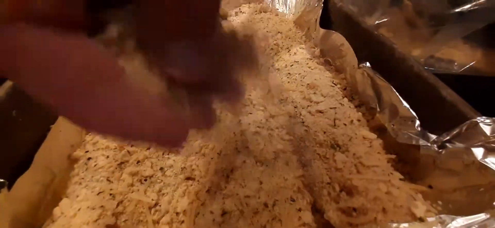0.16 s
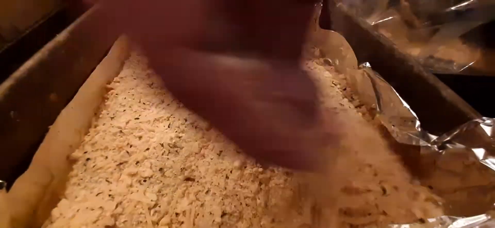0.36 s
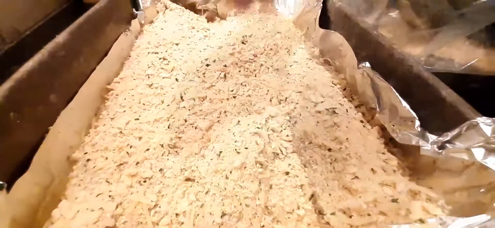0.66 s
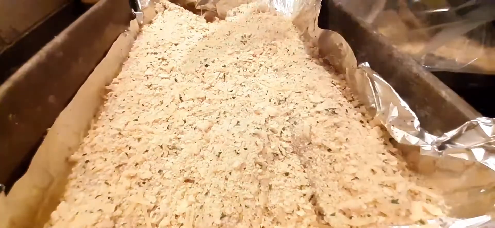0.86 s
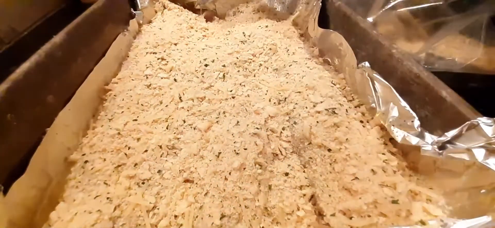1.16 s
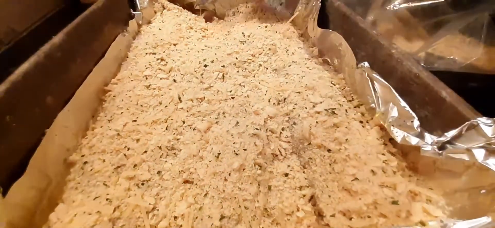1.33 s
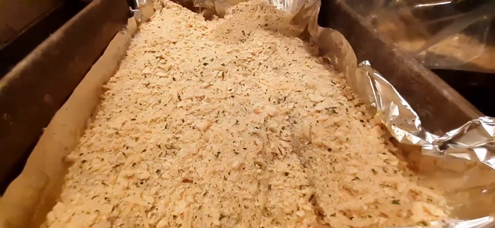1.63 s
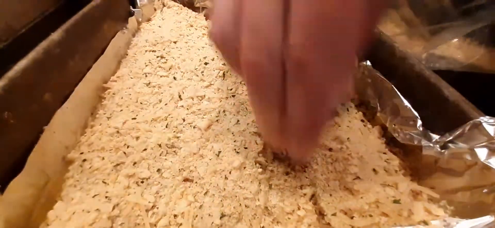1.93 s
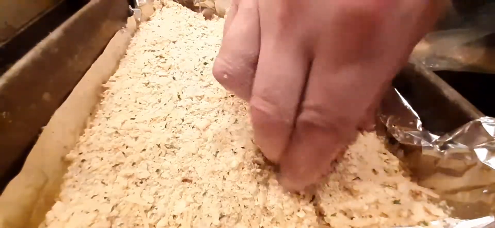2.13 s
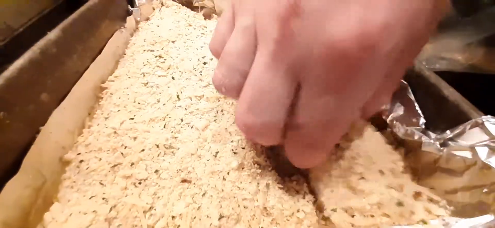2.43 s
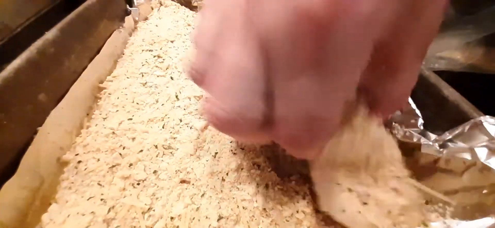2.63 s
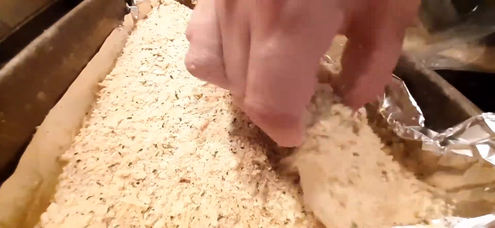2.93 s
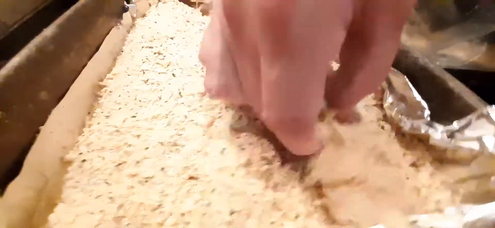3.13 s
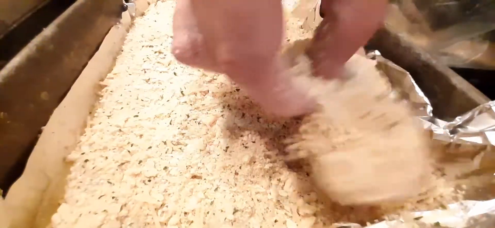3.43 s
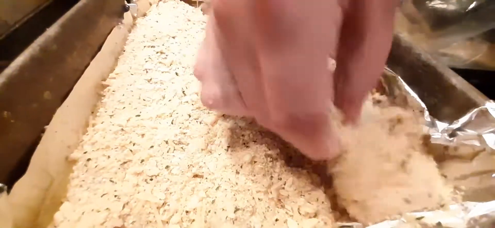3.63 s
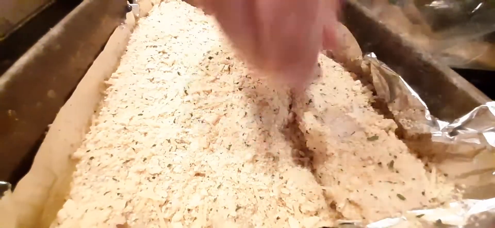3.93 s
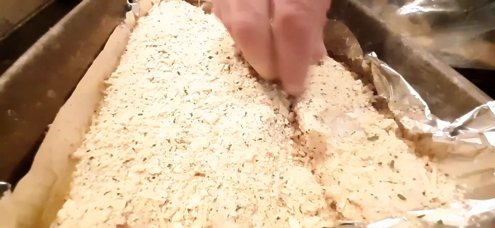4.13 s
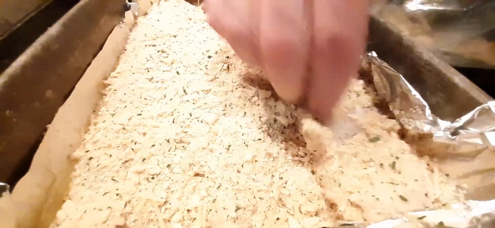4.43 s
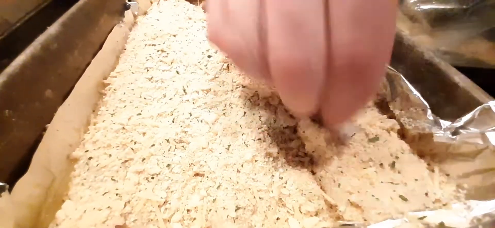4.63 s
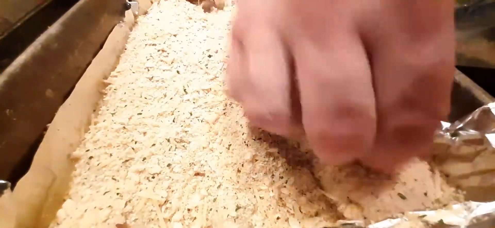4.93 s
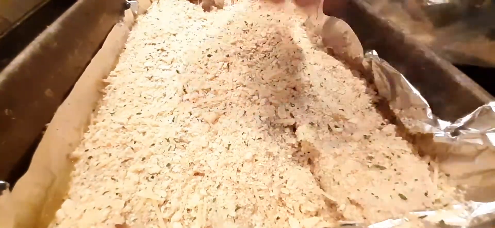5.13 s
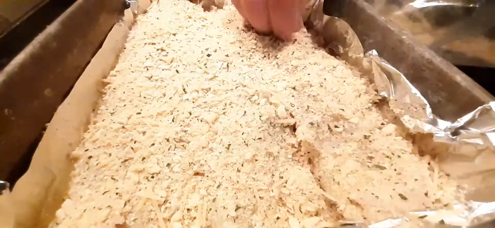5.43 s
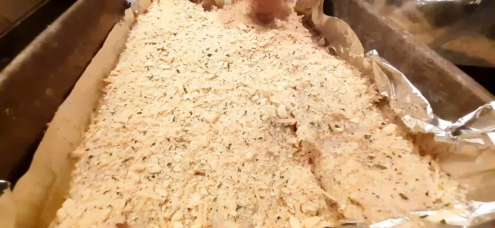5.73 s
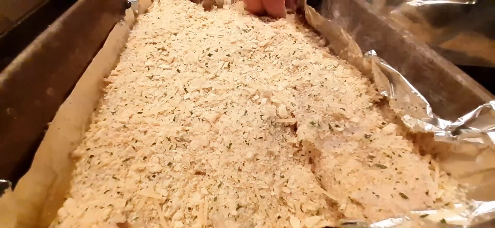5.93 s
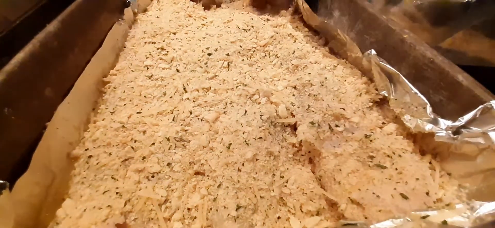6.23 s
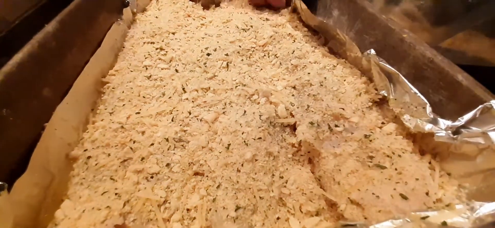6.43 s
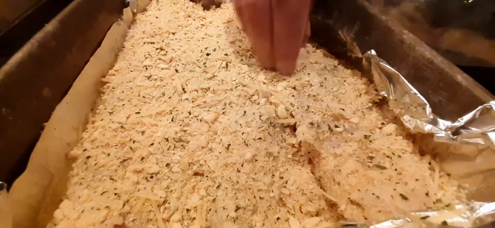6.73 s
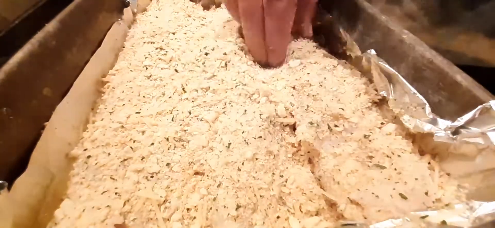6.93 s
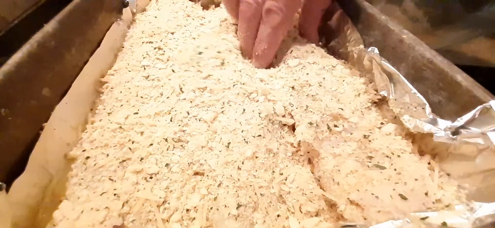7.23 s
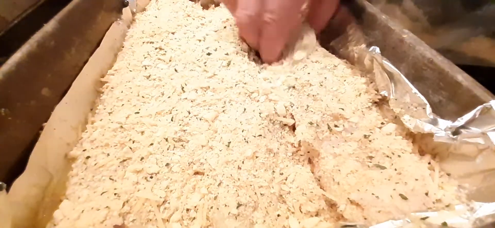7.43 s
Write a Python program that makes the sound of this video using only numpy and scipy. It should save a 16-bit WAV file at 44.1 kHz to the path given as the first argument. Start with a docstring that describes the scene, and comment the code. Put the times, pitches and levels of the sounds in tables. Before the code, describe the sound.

A pinch of dry cracker crumbs lands with a brittle crackle on fish in a foil-lined metal pan. Fingers pat and push the coating, making the foil snap and the pan tick. A fillet is dragged aside with gritty rustling, then light touches lead to three firm pats and a last few shoves. It all sounds close, over a low kitchen appliance hum.

```python
"""Fingers coat fish with dry cracker crumbs in a foil-lined metal pan, over a humming kitchen appliance.
First a pinch of crumbs lands: brittle grains fracture and foil creases snap. From 0.4 s pats and shoves
bump the soft fish, rustle the foil and knock the pan; near 1 s a thin, high whine glides in and out.
More crumbs fall, and from 2 to 4 s the hand drags a fillet aside, buckling the foil. Light touches follow,
then three firm pats around 6 s as the whine returns, and a few last pats, shoves and sprinkles."""
import sys
import numpy as np
from scipy import signal
from scipy.fft import rfft, irfft, next_fast_len
from scipy.io import wavfile
from scipy.ndimage import map_coordinates

SR = 44100
rng = np.random.default_rng(int(sys.argv[2]) if len(sys.argv) > 2 else 0)


def materialize(psi):
    """Save the field psi as 16-bit PCM at rate SR to the path in sys.argv[1].

    A 1-D psi becomes a single channel; in a 2-D psi each row is a channel.
    """
    bounded = np.clip(np.atleast_2d(psi).T, -1, 1)
    quanta = np.round(bounded * 32767).astype(np.int16)
    wavfile.write(sys.argv[1], SR, quanta)


N = 333396
TIME = np.arange(N) / SR


def from_db(db):
    """Amplitude ratio of a level in decibels."""
    return 10 ** (np.asarray(db) / 20)


def unit_rms(x):
    """Normalisation to a mean power of one."""
    return x / np.sqrt(np.mean(x ** 2) + 1e-20)


def at_hz(points, hz):
    """Interpolation of a spectrum on a log-frequency axis."""
    freqs, values = np.transpose(points)
    return np.interp(np.log(hz + 1), np.log(freqs), values)


def panned(db):
    """Level difference, left minus right, as two gains of mean power one."""
    return unit_rms(from_db(np.array([[db], [-db]]) / 2))


def drift(per_s):
    """Random modulation of unit rms, interpolated between per_s values a second."""
    knots = rng.standard_normal(4096)
    return unit_rms(map_coordinates(knots, [TIME * per_s], order=1, mode="wrap"))


def add(out, s, sound):
    """Superposition of a short sound or envelope at time s."""
    start = max(int(s * SR), 0)
    out[:, start:start + sound.shape[1]] += sound[:, :max(N - start, 0)]


def through(x, response):
    """Convolution, kept to the length of the scene."""
    return signal.oaconvolve(x, response, axes=-1)[:, :N]


def minimum_phase(spectrum, size=1024):
    """Causal impulse response of unit energy, from the folded cepstrum of a spectrum."""
    magnitude = from_db(at_hz(spectrum, np.fft.rfftfreq(size, 1 / SR)))
    cepstrum = irfft(np.log(magnitude))
    cepstrum[1:size // 2] *= 2
    cepstrum[size // 2 + 1:] = 0
    response = irfft(np.exp(rfft(cepstrum)))
    return response / np.linalg.norm(response)


def resonance(x, hz, width):
    """Damped two-pole resonator with unit peak gain."""
    radius = np.exp(-np.pi * width / SR)
    feedback = [1, -2 * radius * np.cos(2 * np.pi * hz / SR), radius ** 2]
    return signal.lfilter(np.array([1, 0, -1]) * (1 - radius ** 2) / 2, feedback, x)


def ringing(x, modes):
    """Modal superposition: a sound plus the resonances it excites, at unit energy."""
    x = x + sum(from_db(db) * resonance(x, hz, width) for hz, width, db in modes)
    return x / np.linalg.norm(x)


# Mains and motor tones: (frequency [Hz], relative level [dB], random modulation depth [ratio])
HUM_TONES = [(60.3, -52.5, 1), (120.25, -43, 0.07), (150, -55, 0), (199.8, -55, 0.84), (241.4, -52, 0.36),
             (256.4, -54.5, 0.2), (433.4, -60.5, 1.8), (443, -59, 1.3)]
# Slow swell of the appliance: (time [s], level before scaling [dB])
APPLIANCE_SWELL = [(0.0, -50), (0.04, -44.5), (2.97, -45), (3.56, -42.5), (4.06, -46.5), (6.13, -44.5),
                   (6.78, -49), (6.89, -44), (7.09, -49.5), (7.39, -47), (7.41, -49), (7.56, -43.5)]
# Air noise: (frequency [Hz], relative spectral level [dB])
AIR_SPECTRUM = [(30, -29), (44, -21), (60, 7), (80, -5), (130, 0), (290, 0), (365, -4.5), (440, -3),
                (700, -9), (1100, -18.5), (2300, -26), (5000, -23.5), (9000, -36), (16000, -40)]
# Resonances in the air noise: (frequency [Hz], bandwidth [Hz], gain [dB])
AIR_RESONANCES = [(1575, 58, 5.5), (2940, 520, -4.5), (4930, 390, -9.5)]
# Likeness of the air noise left and right: (frequency [Hz], coherence [0-1])
AIR_COHERENCE = [(60, 1), (130, 0.54), (250, 0.53), (500, 0.32), (1000, 0), (16000, 0)]
def appliance():
    """Tonal plus broadband noise: mains and motor tones waver over a partly coherent rush of air."""
    swell_db = np.interp(TIME, *np.transpose(APPLIANCE_SWELL))
    swell_db -= swell_db.mean()
    hum = 0
    for hz, db, depth in HUM_TONES:
        phasor = 1 + depth * (drift(9) + 1j * drift(9))
        hum += from_db(db) * unit_rms(np.real(phasor * np.exp(2j * np.pi * hz * TIME)))
    size = next_fast_len(N)
    freqs = np.fft.rfftfreq(size, 1 / SR)
    mid, side = rfft(rng.standard_normal((2, size)))
    coherence = np.clip(at_hz(AIR_COHERENCE, freqs), 0, 1)
    stereo = np.sqrt(1 + coherence) * mid + np.sqrt(1 - coherence) * side * [[1], [-1]]
    rush = irfft(from_db(at_hz(AIR_SPECTRUM, freqs)) * stereo, size)[:, :N]
    air = unit_rms(ringing(rush, AIR_RESONANCES))
    hum_gain, air_gain = from_db(-3 + 1.08 * swell_db), from_db(-47.5 + 0.16 * swell_db)
    return hum_gain * hum * panned(4.0) + air_gain * air * panned(0.17)


def power_shares(db, foil_db):
    """Power is amplitude squared: one gesture's push, rustle and crackle, as a column."""
    return from_db([[db], [db + foil_db], [db]]) ** 2


def swells(rows, release):
    """Gaussian power envelopes; release is the ratio of fall time to rise time."""
    power = np.zeros((3, N))
    for s, rise_s, db, foil_db in rows:
        near = slice(max(int((s - 4 * rise_s) * SR), 0), int((s + 5 * rise_s) * SR))
        age = TIME[near] - s
        width_s = np.where(age < 0, rise_s, rise_s * release)
        power[:, near] += power_shares(db, foil_db) * np.exp(-(age / width_s) ** 2)
    return power


# Falling pinches of crumbs: (crest time [s], rise time [s], relative level [dB], foil offset [dB])
PINCHES = [(.096, 0.022, -42.5, 8), (.145, 0.023, -50, 7), (1.388, 0.011, -46.5, -19),
           (1.445, 0.027, -42, -1), (1.55, 0.48, -61, 4.5), (2.49, 0.068, -50, 11),
           (3.565, 0.064, -38.5, -4), (5.645, 0.018, -49, 0), (5.77, 0.077, -64, -10), (7.26, 0.05, -49, 4),
           (7.447, 0.0082, -36.5, -11)]
def sprinkles():
    """Many small impacts merge into one smooth power envelope as each pinch rains on the coating."""
    return swells(PINCHES, release=1.14)


# Crack of a crumb: (frequency [Hz], relative spectral level [dB])
CRUMB_SPECTRUM = [(1200, -13.5), (3000, -1.5), (4500, -1), (6500, -0.5), (9000, -1), (12500, 0.2),
                  (16000, -4)]
def crumb_fracture():
    """Brittle fracture: a sudden release of stress radiates a bright, broadband pulse."""
    return minimum_phase(CRUMB_SPECTRUM)


# Tick of the foil: (frequency [Hz], relative spectral level [dB])
FOIL_SPECTRUM = [(400, -16), (850, -6), (1200, 2.5), (2100, 4), (2500, 2.5), (3600, -1), (5500, -2.5),
                 (12000, -19.5)]
# Ringing of the foil in the pan: (frequency [Hz], bandwidth [Hz], gain [dB])
FOIL_RESONANCES = [(1410, 240, -5), (1853, 120, 1.5), (2980, 43, 1.5), (3970, 120, 0.5)]
def foil_tick():
    """Impulse response of a thin sheet: a click that rings the foil's modes."""
    return ringing(minimum_phase(FOIL_SPECTRUM), FOIL_RESONANCES)


def pan_echoes(t60, echo_db, size=512):
    """Early reflections: a direct click and its dense echoes in the pan, different left and right."""
    echoes = rng.standard_normal((2, size)) * from_db(-60 * TIME[:size] / t60)
    echoes *= from_db(echo_db) / np.linalg.norm(echoes, axis=1, keepdims=True)
    echoes[[0, 1], rng.integers(0, 26, 2)] += 1   # direct path, with its own delay on each side
    return echoes / np.linalg.norm(echoes, axis=1, keepdims=True)


def grains(response, per_s, spread_db, clump_db, spots=8):
    """Shot noise of unit rms: uneven impulses, swelling in clumps, from several spots in the pan."""
    sizes = from_db(spread_db * np.minimum(rng.exponential(1, N), 4) + clump_db * drift(220))
    clicks = sizes * rng.choice([-1, 1], N) * (rng.random(N) < per_s / SR)
    spot = rng.integers(0, spots, N)
    swarm = sum(through((clicks * (spot == k))[None], pan_echoes(t60=0.014, echo_db=-0.5))
                for k in range(spots))
    return unit_rms(through(swarm, response[None]))


# Dull push on the fish: (frequency [Hz], relative spectral level [dB])
FISH_SPECTRUM = [(50, -26), (110, -7.5), (220, -6.5), (520, -8), (850, -3.5), (1300, -15.5), (3000, -49.5)]
def strokes(push, rustle, crackle):
    """Amplitude-modulated shot noise: the hand bumps the fish, crumples the foil and grinds crumbs."""
    fish = push * grains(minimum_phase(FISH_SPECTRUM), per_s=2500, spread_db=1.5, clump_db=1.5)
    foil = rustle * grains(foil_tick(), per_s=2400, spread_db=1.5, clump_db=3.1)
    crumbs = crackle * grains(crumb_fracture(), per_s=4200, spread_db=2.5, clump_db=2.5)
    return from_db(-1.5) * fish + from_db(1.4) * foil + from_db(1.54) * crumbs


def trickle(crackle, fade_s=0.05):
    """Exponential relaxation: loosened crumbs roll and tick on after each touch as their energy decays."""
    retained = np.exp(-1 / (fade_s * SR))
    power = np.mean(crackle ** 2, axis=0) + 1e-18
    motion = np.sqrt(signal.lfilter([1 - retained], [1, -retained], power))
    ticks = grains(crumb_fracture(), per_s=350, spread_db=-3.5, clump_db=9.5)
    return from_db(-23) * motion * ticks * panned(0.85)


def strays(crackle, per_s=35):
    """A Poisson process: under the fingers, larger crumbs give way at random and tick on the foil."""
    sizes = from_db(-12 + 3.5 * np.clip(rng.standard_normal(N), -2, 2))
    load = np.minimum(crackle, from_db(-45.5))   # a crumb can only take so much
    clicks = load * sizes * (rng.random(N) < per_s / SR) * np.sqrt(SR / per_s)
    crack = crumb_fracture() + from_db(-6) * foil_tick()
    return through(clicks, through(crack[None], pan_echoes(t60=0.035, echo_db=6.5)))


# Single crumbs breaking: (time [s], relative level [dB])
CRUMB_BREAKS = [(.064, -41), (0.0993, -29), (0.116, -30), (0.133, -32.5), (0.1766, -38), (.239, -46),
                (.274, -46), (0.295, -39), (0.939, -51.5), (1.313, -46), (1.3876, -38), (1.419, -36.5),
                (1.4363, -32), (1.4656, -34), (1.533, -45.5), (1.749, -46), (2.137, -39.5), (2.2314, -36),
                (2.272, -35), (2.332, -36.5), (2.45, -27.5), (3.428, -45), (3.5427, -45), (3.838, -37.5),
                (3.863, -38.5), (4.85, -48.5), (4.9662, -32), (5.376, -44), (6.319, -47), (6.4022, -38),
                (6.8503, -37), (7.2489, -33.5), (7.446, -32.5), (7.534, -35)]
# Foil creases flipping: (time [s], relative level [dB], left minus right [dB])
CREASE_FLIPS = [(.073, -34.5, 17), (0.3608, -23, 6), (.393, -32, 5), (.434, -32, 2), (1.028, -34.5, 4),
                (1.052, -33, 18), (1.076, -34, -1), (1.257, -38, 4), (2.584, -30.5, 15), (2.652, -29, 15),
                (2.724, -32.5, 6), (2.802, -29.5, 19), (3.032, -36.5, 5), (3.066, -29, 11),
                (3.1821, -37, 13), (3.999, -43.5, -9), (4.062, -46, -6), (4.9, -33.5, 2),
                (5.2191, -43.5, -5), (5.8791, -28.5, 2), (6.3314, -25, -3), (6.718, -52, -1),
                (7.3588, -34, 8)]
def snaps(crumb_to_foil_db=-13.5, crease_to_crumb_db=-7.5, crumb_pan_db=4.5):
    """Mechanical coupling: a breaking crumb rings the foil, and a flipping crease cracks crumbs."""
    out, foil, crumb = np.zeros((2, N)), foil_tick(), crumb_fracture()
    breaks = [(s, db + crumb_to_foil_db, db, crumb_pan_db) for s, db in CRUMB_BREAKS]
    flips = [(s, db, db + crease_to_crumb_db, pan_db) for s, db, pan_db in CREASE_FLIPS]
    for s, foil_db, crumb_db, pan_db in breaks + flips:
        crack = from_db(23.5) * (from_db(foil_db) * foil + from_db(crumb_db) * crumb)
        add(out, s, through(crack * panned(pan_db), pan_echoes(t60=0.03, echo_db=18)))
    return out


def kitchen(x, t60=0.52, build_s=0.0014, wall_cut_hz=10000, size=32768):
    """Reverberation: hard walls return a diffuse, decaying tail, a little duller than the direct sound."""
    age = TIME[:size]
    tail = rng.standard_normal((2, size)) * from_db(-60 * age / t60) * (1 - np.exp(-age / build_s))
    tail /= np.linalg.norm(tail, axis=1, keepdims=True)
    return through(x, signal.lfilter(*signal.butter(1, wall_cut_hz, fs=SR), tail))


# Fingertips on the lined pan: (time [s], level before panning [dB], frequency [Hz], 60 dB decay time [s])
PAN_KNOCKS = [(.362, -21.5, 940, 0.011), (1.076, -29, 788, 0.055), (2.586, -20.5, 1830, 0.019),
              (2.652, -22, 1740, 0.023), (5.11, -54, 990, 0.0098), (5.138, -34, 715, 0.013),
              (6.716, -39.5, 1150, 0.013), (6.965, -29.5, 562, 0.11)]
def knocks():
    """Damped free vibration: a fingertip sets the pan ringing briefly at one frequency."""
    out, age = np.zeros((2, N)), TIME[:4096]
    for s, db, hz, t60 in PAN_KNOCKS:
        add(out, s, from_db(db - 60 * age / t60) * np.sin(2 * np.pi * hz * age) * panned(8.3))
    return out


# Fingers patting the crumbs down: (crest time [s], relative level [dB], foil offset [dB])
FINGER_PATS = [(.375, -36.5, -7), (1.033, -36.5, -3), (1.054, -47, -8), (1.077, -47.5, -1),
               (1.266, -45, -13), (4.908, -40, 1), (5.608, -43, -7.5), (5.865, -28.5, 0), (6.101, -28, 1),
               (6.331, -26, -1.5), (6.973, -34.5, 4), (7.006, -32.5, 1)]
def pats(rise_s=0.0076, fall_s=0.016, settle_s=0.018, settle_db=-8):
    """Impact and relaxation: a pat's power rises quickly, falls, and trails off as the coating settles."""
    age = TIME[:SR] - 4 * rise_s
    landing = np.exp(-(age / rise_s) ** 2)
    falling = np.exp(-abs(age / fall_s) ** 1.72)
    settling = from_db(settle_db) ** 2 * np.exp(-abs(age) / settle_s)
    shape = np.where(age < 0, landing, falling + settling)
    power = np.zeros((3, N))
    for s, db, foil_db in FINGER_PATS:
        add(power, s + age[0], power_shares(db, foil_db) * shape)
    return power


# Fingers shoving: (crest time [s], rise time [s], relative level [dB], foil offset [dB])
FINGER_SHOVES = [(.412, 0.025, -34.5, -5), (2.01, 0.023, -60, 9), (2.16, 0.027, -49.5, 1.5),
                 (2.252, 0.013, -41.5, 1), (2.632, 0.056, -39.5, 2.5), (2.82, 0.013, -31.5, 0.5),
                 (2.982, 0.016, -33, 2), (3.155, 0.019, -34.5, 1.5), (3.33, 0.012, -40, 1),
                 (3.39, 0.011, -40.5, -12), (3.623, 0.017, -32.5, -3.5), (3.657, 0.013, -31.5, 0),
                 (3.797, 0.015, -44, 0.5), (4.24, 0.028, -51.5, -1.5), (4.478, 0.027, -56, 0.5),
                 (4.685, 0.013, -51.5, -1.5), (5.36, 0.035, -53, -3), (6.75, 0.034, -63.5, 4),
                 (6.895, 0.043, -45, -1.5), (7.363, 0.012, -40, -2), (7.455, 0.068, -52.5, 3.5)]
def shoves():
    """Transient friction: power swells and fades as crumbs and fish slide across the foil."""
    return swells(FINGER_SHOVES, release=0.94)


# Ringing of a buckling patch of foil: (frequency [Hz], bandwidth [Hz], gain [dB])
PATCH_RESONANCES = [(1830, 130, 1.5), (1970, 140, -14), (2230, 89, -4)]
def buckles(patting, shoving, spring_back_s=0.039, knee_db=-38):
    """Snap-through buckling: creases crunch under a firm shove, or flip back just after a pat."""
    click = signal.unit_impulse(1024)
    patch = sum(from_db(db) * resonance(click, hz, width) for hz, width, db in PATCH_RESONANCES)
    pat, shove = patting[1], shoving[1]   # the power that reaches the foil
    rebound = np.interp(TIME - spring_back_s, TIME, pat)
    yielding = shove / (shove + from_db(knee_db) ** 2)   # one half at the knee
    strength = from_db(-1.5) * yielding * np.sqrt(shove) + from_db(-12.5) * np.sqrt(rebound)
    return strength * grains(patch, per_s=350, spread_db=1.5, clump_db=-0.2) * panned(9.1)


# Glides of the whine: (start [s], end [s], first frequency [Hz], last frequency [Hz], nominal level [dB])
WHINE_GLIDES = [(.93, 1.07, 11300, 12700, -70), (1.134, 1.287, 12700, 14300, -64),
                (5.672, 5.87, 13100, 13300, -67), (5.9, 6.162, 13400, 13300, -71),
                (6.163, 6.335, 13600, 12100, -60)]
def whine(wander_hz=180, jitter_hz=140, flicker_db=4.4):
    """Frequency and amplitude modulation: a faint, very high tone glides, wanders and flickers."""
    out = np.zeros(N)
    deviation_hz = wander_hz * drift(20) + jitter_hz * drift(900)
    for start, end, first_hz, last_hz, db in WHINE_GLIDES:
        progress = np.clip((TIME - start) / (end - start), 0, 1)
        hz = first_hz + (last_hz - first_hz) * progress + deviation_hz
        tone = np.sqrt(2) * np.sin(2 * np.pi * np.cumsum(hz) / SR)
        out += from_db(db) * np.sin(np.pi * progress) * tone
    return from_db(flicker_db * drift(35)) * out


# Rubbing of the dragged fillet: (time [s], relative level [dB])
DRAG_LEVEL = [(2.05, -64), (2.184, -50), (2.316, -51), (2.636, -44.5), (3.542, -47.5), (3.706, -63),
              (3.842, -56), (4.0, -75)]
def drag(fade_s=0.13):
    """Sustained friction: the power of rubbing while the hand stays in the crumbs and moves a fillet."""
    times, levels_db = np.transpose(DRAG_LEVEL)
    contact = np.clip(np.minimum(TIME - times[0], times[-1] - TIME) / fade_s, 0, 1)
    return (from_db(np.interp(TIME, times, levels_db)) * contact) ** 2


def excitation(sprinkling, patting, shoving, dragging):
    """Incoherent sources add in power; the root gives stereo amplitudes of push, rustle and crackle."""
    # (power, gains of push, rustle and crackle [dB], left minus right [dB])
    gestures = [(sprinkling, (-10, -9, 0.5), 1),
                (patting, (-5.5, -1.5, -1), 2),
                (shoving, (-10, -1, -0.5), 4),
                (dragging, (-7, -0.5, -2), 4)]
    total = np.zeros((3, 2, N))
    for power, mix_db, pan_db in gestures:
        gains = from_db(mix_db)[:, None, None] * panned(pan_db)
        total += power[..., None, :] * gains ** 2
    return np.sqrt(total)


def scene():
    """Superposition: direct sound from the pan, its reverberation, the appliance and the whine."""
    patting, shoving = pats(), shoves()
    push, rustle, crackle = excitation(sprinkles(), patting, shoving, drag())
    pan = strokes(push, rustle, crackle) + buckles(patting, shoving)
    pan += trickle(crackle) + strays(crackle) + snaps() + knocks()
    return pan + from_db(-11.5) * kitchen(pan) + appliance() + whine()


def record(dry, cutoff_hz=15900):
    """An elliptic low-pass filter cuts the highest treble steeply."""
    return signal.sosfilt(signal.ellip(10, .2, 70, cutoff_hz, fs=SR, output="sos"), dry)


dry = scene()
out = record(dry)
materialize(out)
```